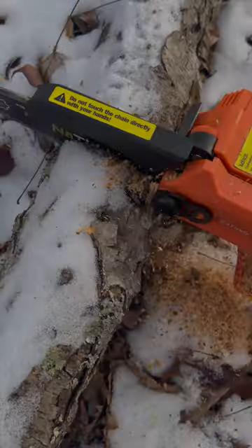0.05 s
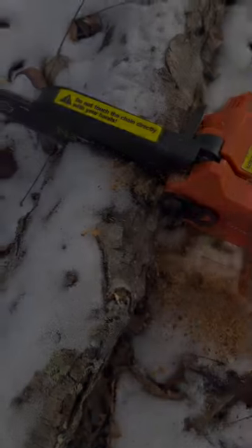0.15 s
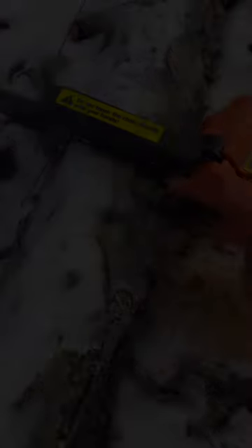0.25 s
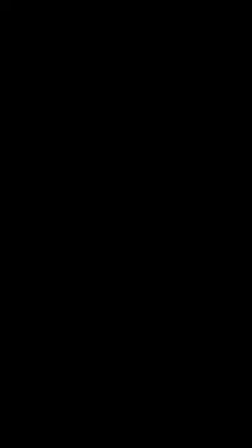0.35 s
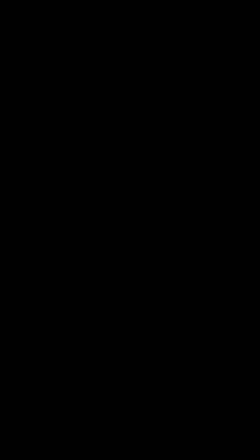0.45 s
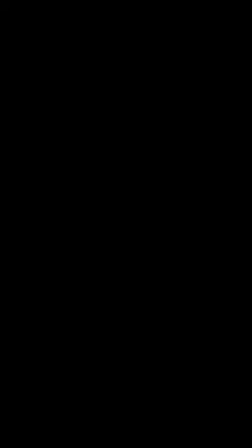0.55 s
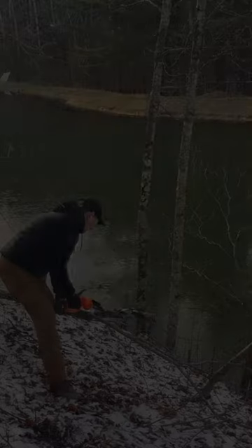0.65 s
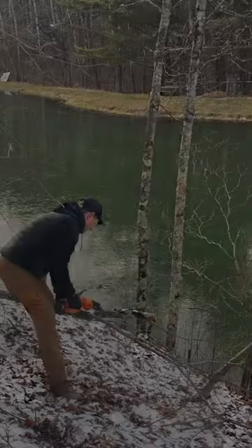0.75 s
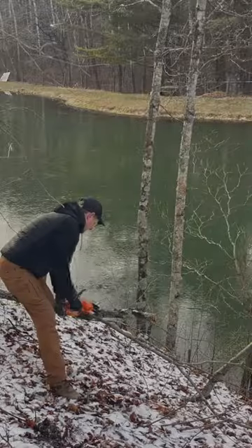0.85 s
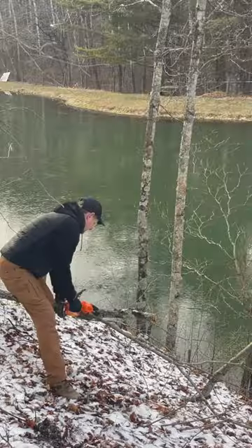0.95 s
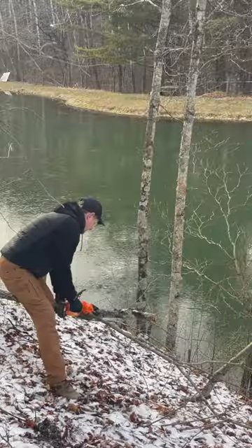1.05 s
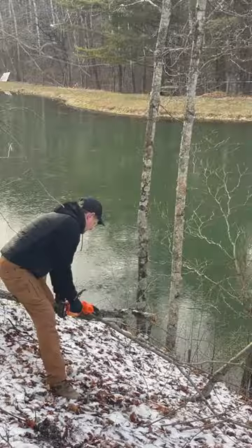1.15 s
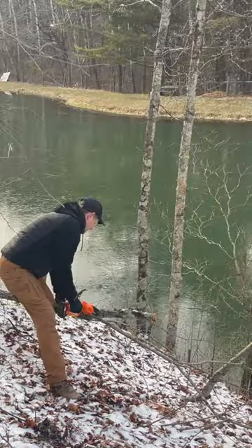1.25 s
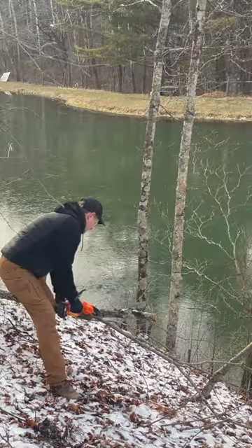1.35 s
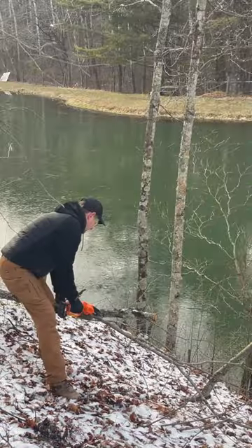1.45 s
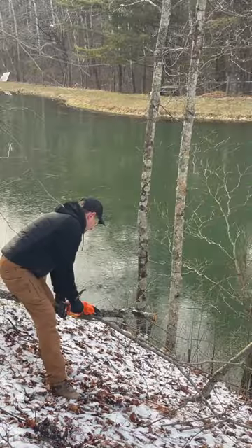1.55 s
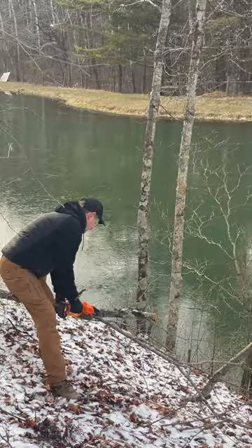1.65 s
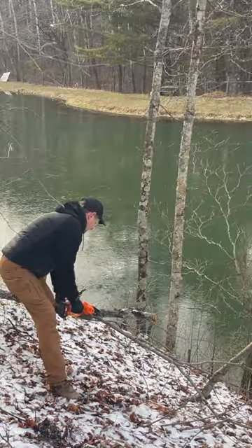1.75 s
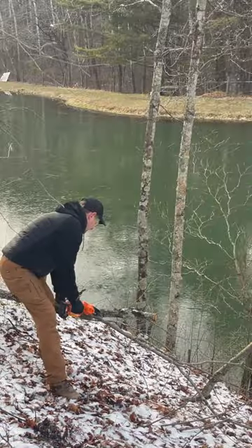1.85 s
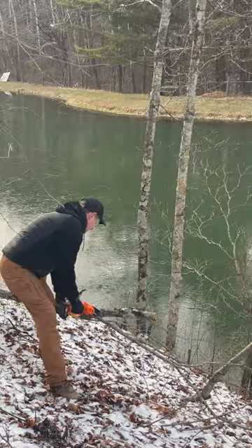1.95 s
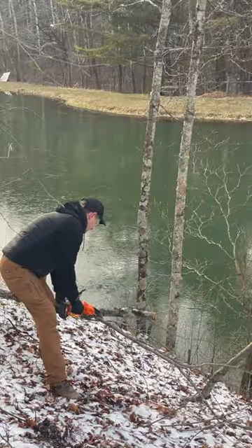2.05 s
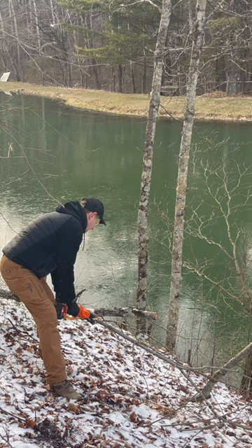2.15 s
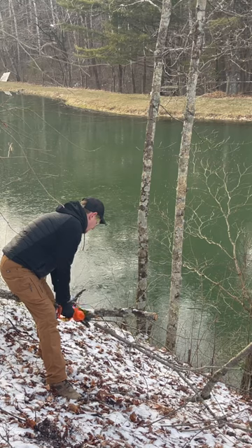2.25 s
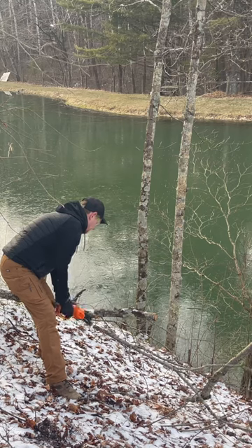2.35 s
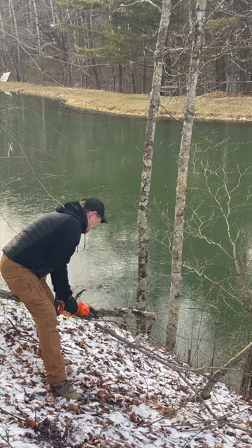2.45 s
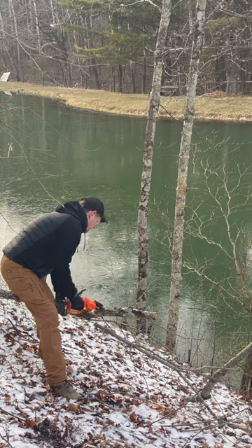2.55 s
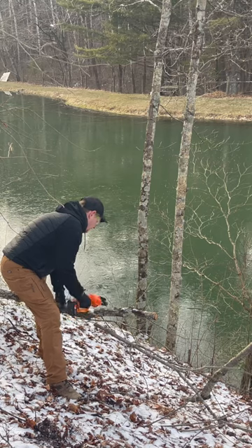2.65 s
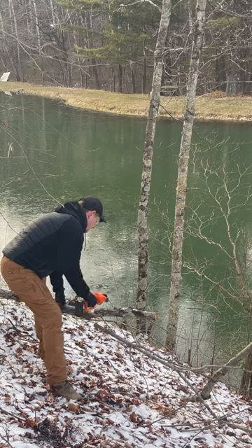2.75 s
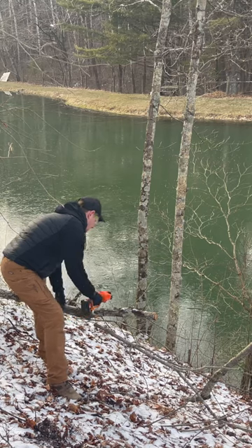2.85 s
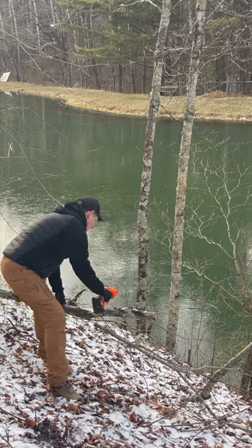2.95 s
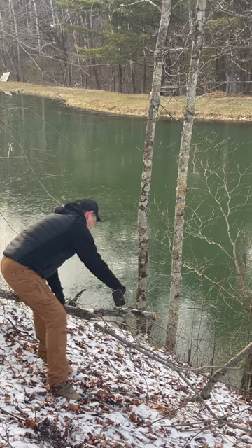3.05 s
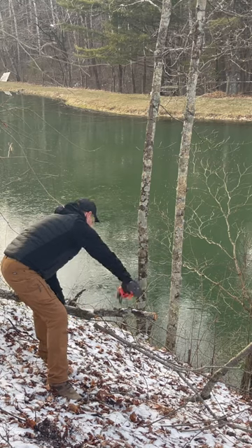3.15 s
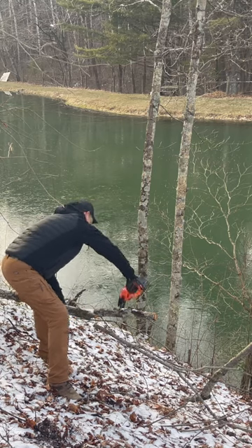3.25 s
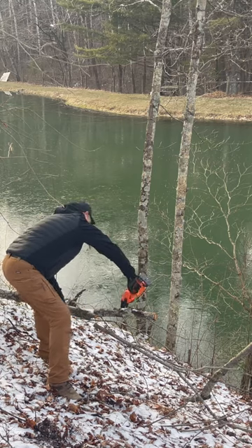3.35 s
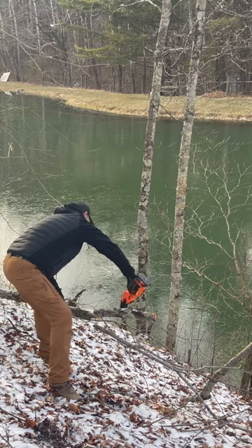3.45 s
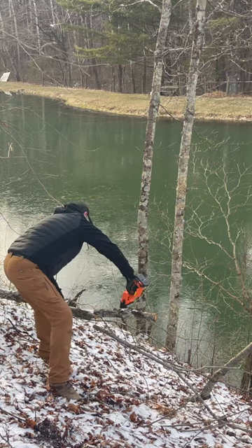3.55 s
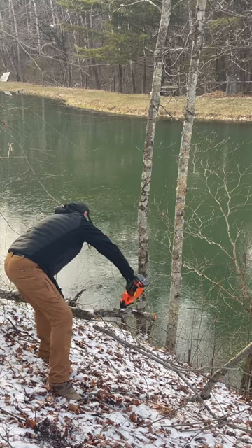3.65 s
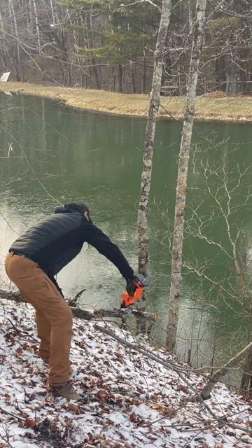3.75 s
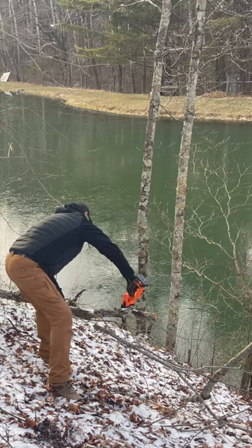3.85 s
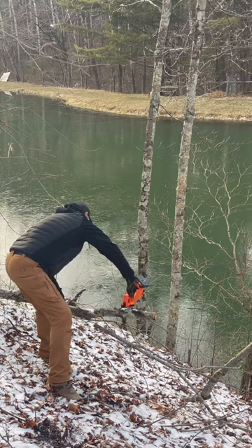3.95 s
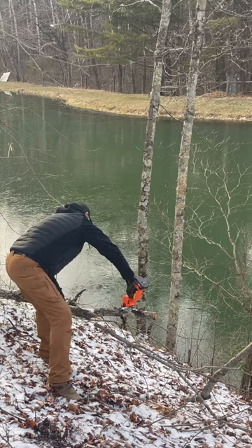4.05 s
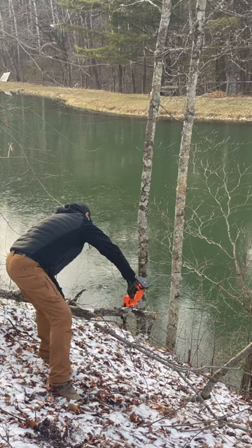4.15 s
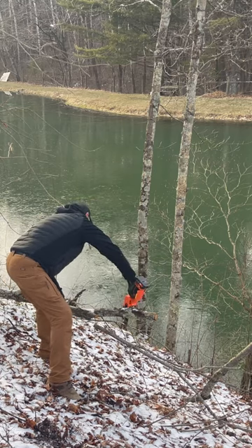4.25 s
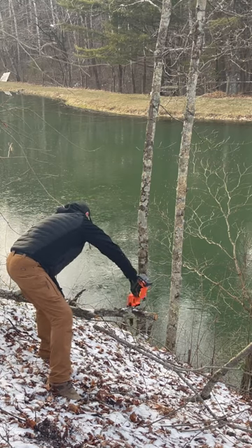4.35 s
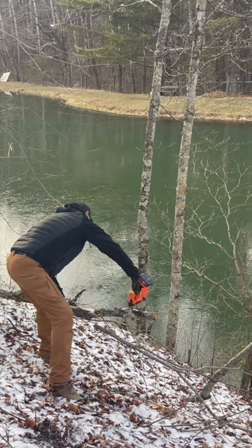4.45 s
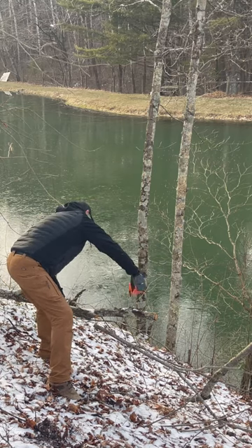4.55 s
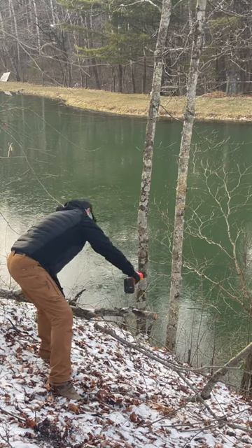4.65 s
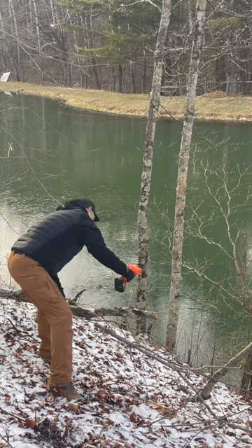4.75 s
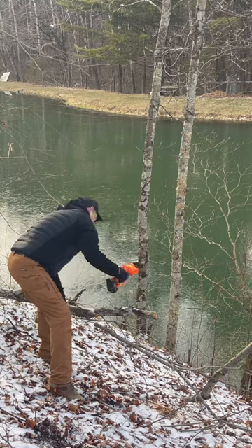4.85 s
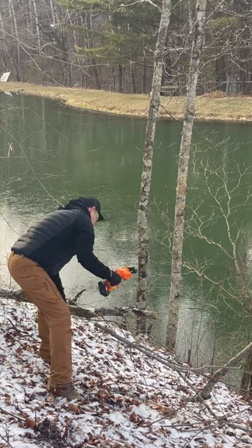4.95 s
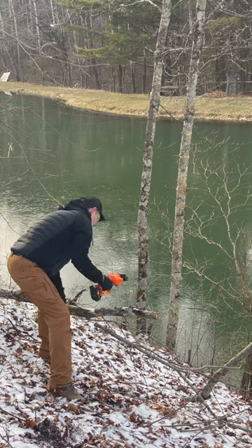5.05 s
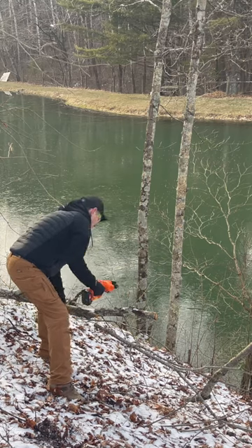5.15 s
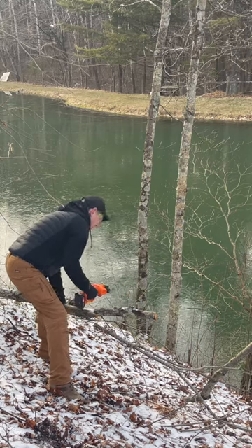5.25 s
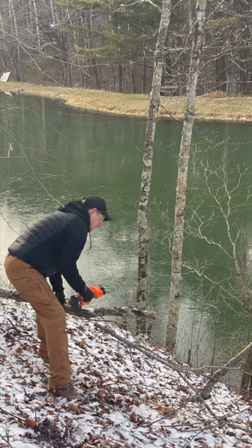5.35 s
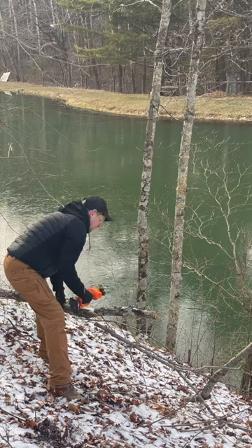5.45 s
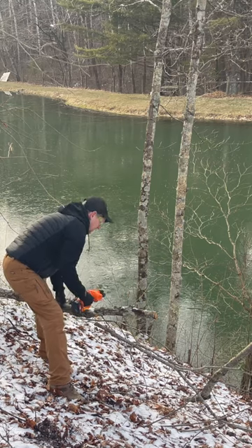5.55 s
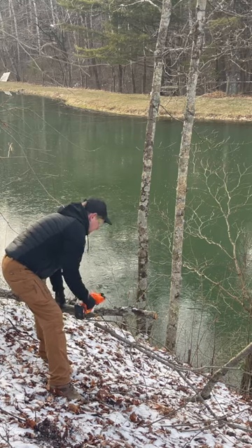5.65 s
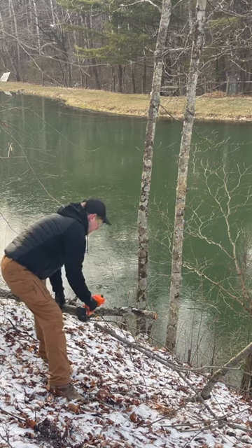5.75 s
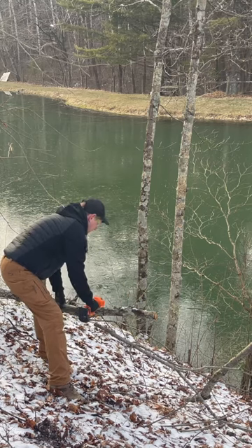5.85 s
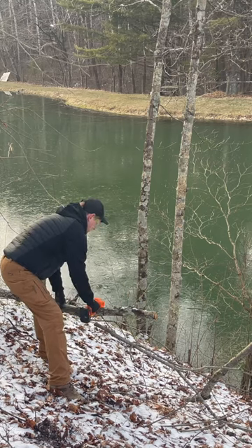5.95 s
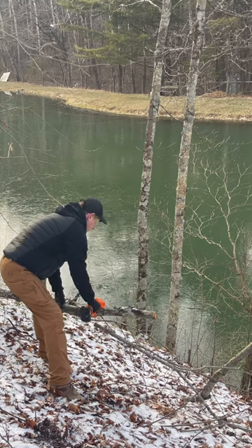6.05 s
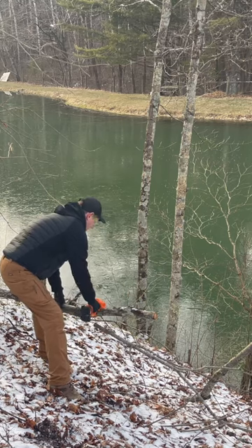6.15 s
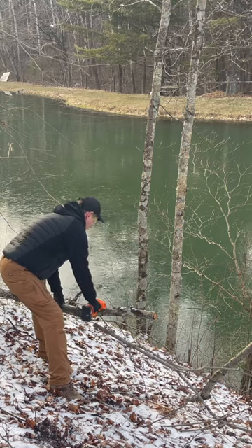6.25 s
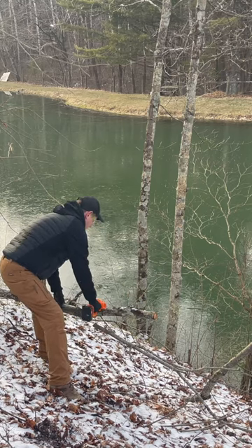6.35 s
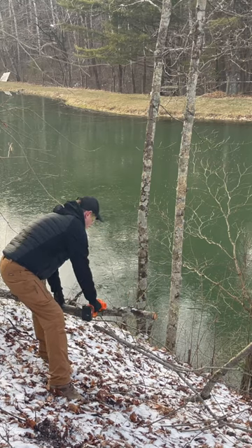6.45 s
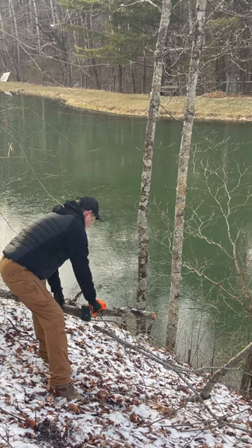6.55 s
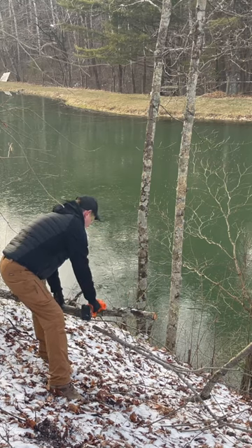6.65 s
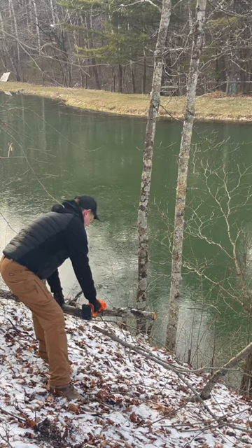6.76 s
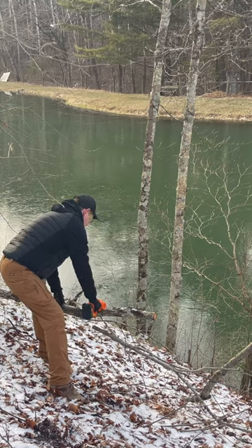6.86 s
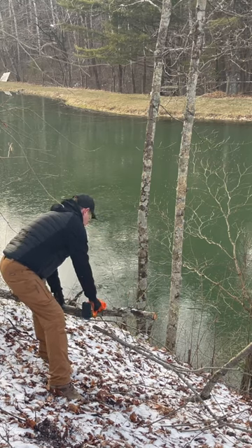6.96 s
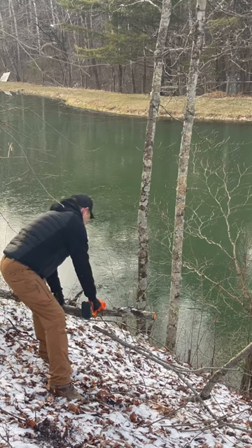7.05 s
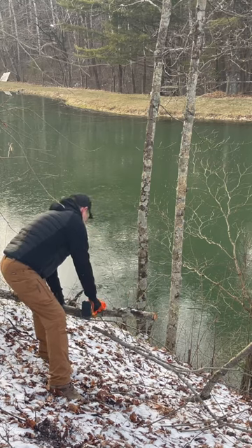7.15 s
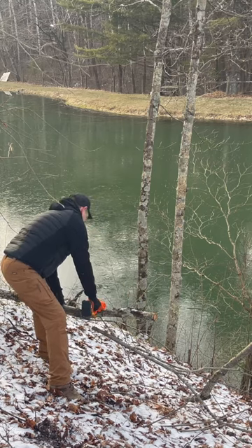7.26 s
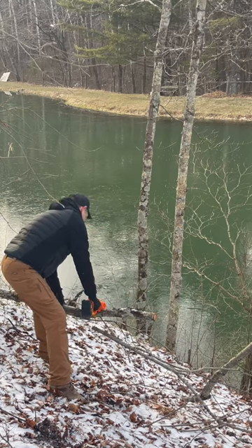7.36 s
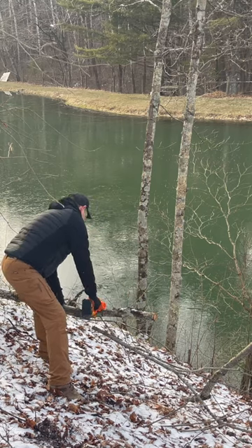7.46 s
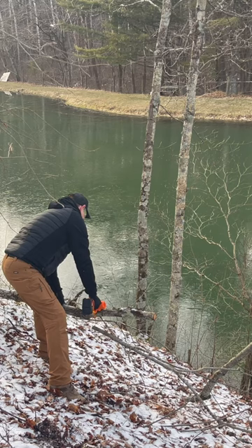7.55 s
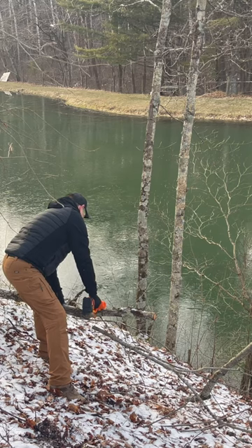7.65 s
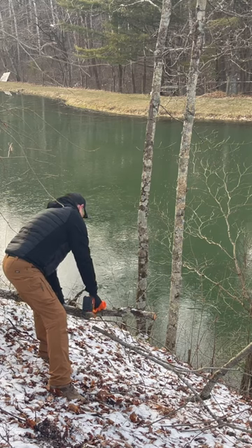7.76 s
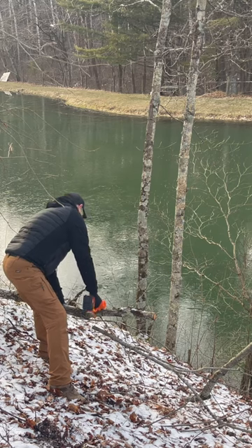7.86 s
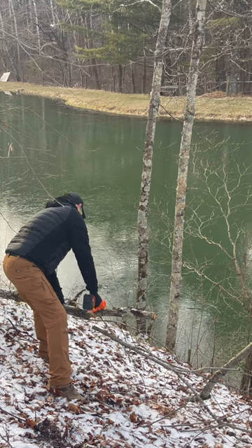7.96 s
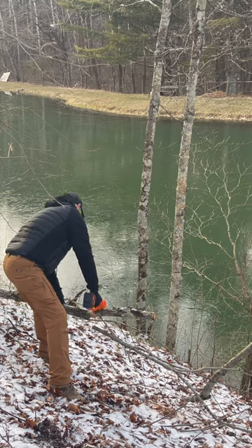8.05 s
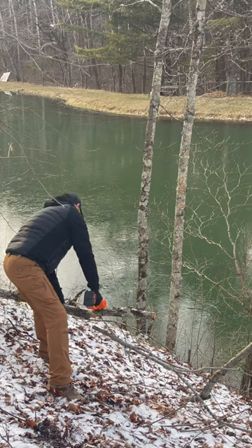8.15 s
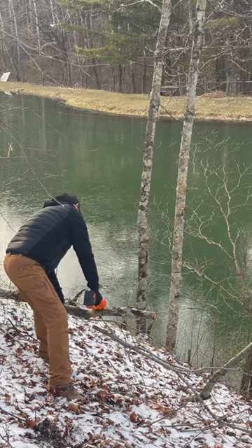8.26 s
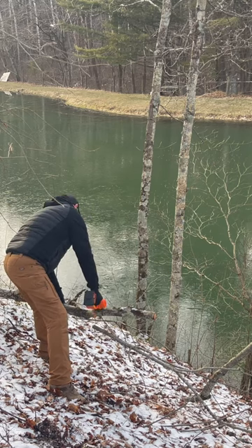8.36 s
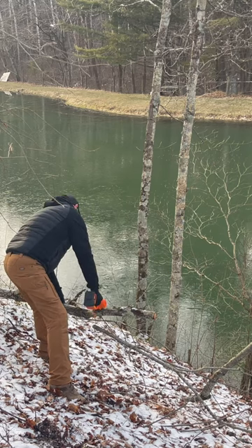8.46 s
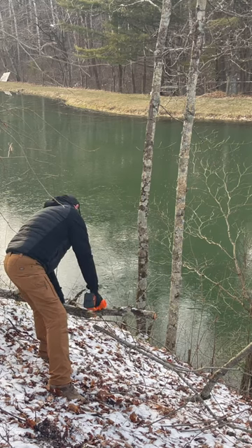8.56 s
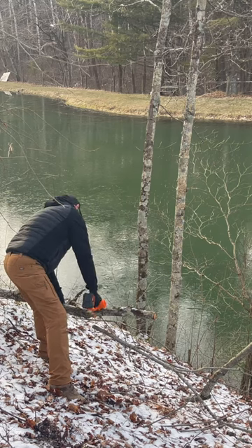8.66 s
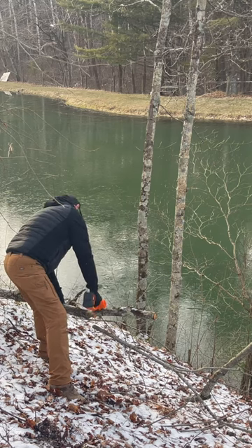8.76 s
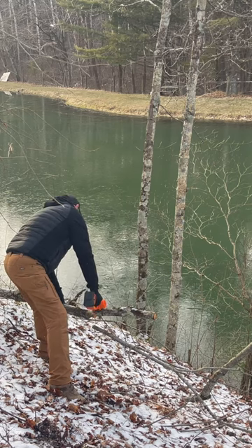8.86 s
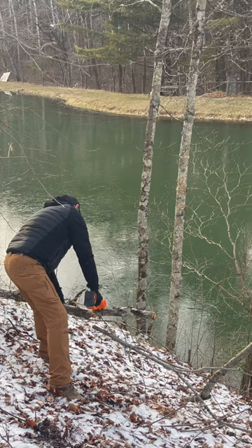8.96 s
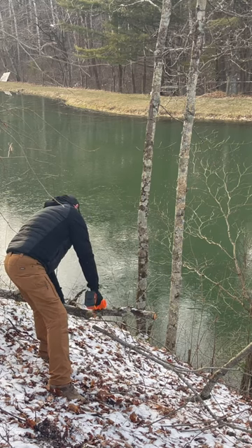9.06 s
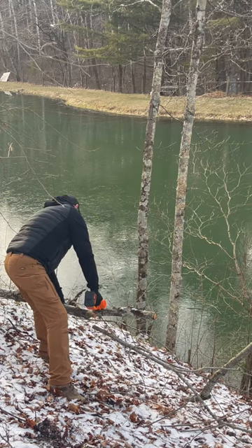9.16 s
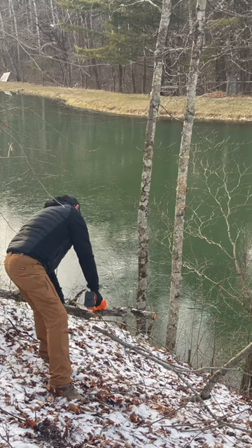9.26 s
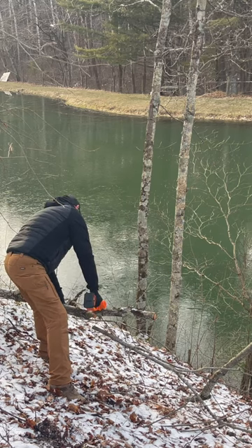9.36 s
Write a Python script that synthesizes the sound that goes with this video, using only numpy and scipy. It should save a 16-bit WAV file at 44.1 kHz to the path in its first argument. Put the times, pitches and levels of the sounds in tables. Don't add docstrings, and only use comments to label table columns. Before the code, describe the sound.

From 0 s a small battery chainsaw is already running, close, wide and gritty with a squeal near 2.4 kHz; around 0.4-0.65 s it melts into a view a few metres off, where a steady whine near 830 Hz sits under harsh chain clatter. At 1.4-2.1 s it bites, pitch sagging, with high squeals and knocks. It brakes abruptly at 2.3 s. The pause has faint clicks, a twig snap and soft thud on snow at 2.8 s. It spins up at 3.2 s, mostly free, with lower squeals and hard knocks at 3.9-4.35 s, stopping about 4.5 s. Leaves rustle; a sharp click comes at 4.8 s. From 5.7 s it restarts, then cuts heavily from 6.2 s to the end at 9.4 s, fluttering, squealing and knocking rapidly. Low distant traffic drones throughout; the wood rings faintly, with a dull late echo.

```python
import sys
import numpy as np
from scipy import signal
from scipy.fft import rfft, irfft, next_fast_len
from scipy.io import wavfile
from scipy.ndimage import uniform_filter1d, map_coordinates

SR = 44100
rng = np.random.default_rng(int(sys.argv[2]) if len(sys.argv) > 2 else 0)


def ratio(d):
    e = np.asarray(d, float) / 20
    return 10 ** e


def unload_wav(signal):
    wavfile.write(
        sys.argv[1],
        SR,
        np.round(np.clip(np.atleast_2d(signal).T, -1, 1) * 32767).astype(np.int16),
    )


N = 415422
T = np.arange(N) / SR

# (pulled [s], let go [s], whine [dB])
TRIGGER_PULLS = [
    (-1, 2.29, -39),
    (3.2, 4.51, -35.5),
    (5.715, 10, -36),
]


def unit(x):
    return x / np.sqrt(np.mean(x ** 2) + 1e-20)


def along(points, hz):
    f, v = np.transpose(points)
    return np.interp(np.log(hz + 1), np.log(f + 1), v)


def curve(rows):
    s, *cols = np.transpose(rows)
    return [np.interp(T, s, c) for c in cols]


def wobble(rate):
    return map_coordinates(rng.standard_normal(int(N * rate / SR) + 4), [T * rate])


def filtered(x, response):
    m = next_fast_len(N + SR // 4)
    return irfft(rfft(x, m) * response(np.fft.rfftfreq(m, 1 / SR)), m)[..., :N]


def noise(colour):
    return unit(filtered(rng.standard_normal(N), lambda hz: ratio(along(colour, hz))))


def ringing(modes):
    def response(f):
        total = 0
        for k, (c, w, db) in enumerate(modes):
            total = total + (-1) ** k * ratio(db) * 1j * f * w / (c * c - f * f + 1j * f * w)
        return total
    return response


def bursts(times, db, t60):
    t = np.arange(SR // 8) / SR
    grit = rng.standard_normal((len(times), len(t)))
    attack = 1 - np.exp(-t / 0.0015)
    return ratio(db[:, None] - 60 * t / t60[:, None]) * attack * grit, np.round(times * SR).astype(int)


def placed(rows, starts):
    at = starts[:, None] + np.arange(rows.shape[1])
    return np.bincount(at.ravel(), rows.ravel(), N + SR)[:N]


def closeness(t):
    close_until_s, crossfade_s = .4, .25
    return np.clip(1 - (t - close_until_s) / crossfade_s, 0, 1)


def trigger():
    spin_up_s, coast_s, brake_after_s = .08, .16, .05
    brake_db_per_s, start_db_per_s = 470, 700
    whine_grows_db = 50
    on, off, whine_db = np.transpose(TRIGGER_PULLS)[:, :, None]
    up = 1 - np.exp(-(np.clip(T - on, 0, None) / spin_up_s) ** 1.5)
    slowed = (np.clip(T - off, 0, None) / coast_s) ** 1.6
    spin = np.clip(up - slowed, .01, 1)
    brake_db = -brake_db_per_s * np.clip(T - off - brake_after_s, 0, None)
    start_db = start_db_per_s * np.clip(T - on - .045, None, 0)
    running = ratio(brake_db + start_db).sum(0)
    whine_gain = ratio(whine_db + brake_db + whine_grows_db * np.log10(spin)).sum(0)
    return spin.max(0), running, whine_gain


def jolts(load):
    # (time [s], bounces [per s])
    bounce_rate = [(0, 32), (6.3, 29), (7.4, 30), (8.2, 42), (9.42, 43)]
    beat = np.cumsum(curve(bounce_rate)[0] * (1 + .08 * wobble(9))) / SR
    shape = 3 * np.exp(-3 * (beat % 1)) - .95
    return load * (1 + .35 * wobble(25)) * shape, np.flatnonzero(np.diff(beat // 1))


def chain(load, jolt, rattle_db, facing):
    # (frequency [Hz], level [dB per Hz])
    free_colour = [(120, -39), (300, -32.5), (450, -19), (1200, -9), (3000, -6.5), (5400, -7), (9000, -7),
                   (10300, -7), (11800, -22)]
    # (frequency [Hz], level [dB per Hz])
    buried_colour = [(90, -27.5), (170, -6.5), (330, -20), (600, -8), (1200, -13), (3000, -11.5),
                     (5400, -13.5), (9000, -9.5), (10300, -21), (11800, -24.5)]
    # (centre [Hz], width [Hz])
    housing = [(230, 540), (760, 77), (1250, 210), (1760, 350), (2850, 130), (3450, 150), (4000, 400),
               (5300, 770), (5750, 380), (6200, 350), (7800, 1200), (8500, 1050)]
    # (level [dB], change with facing [dB], in wood [dB], close by [dB])
    housing_lifts = [(2, .5, 0, 11), (7, 4, -2, -2), (-2.5, 1, 2, 2), (6, 3.5, -1, 2), (-5, 4, 8, -6),
                     (0, 4.5, 0, -3), (4, 0, 1.5, 0), (.5, 0, 0, 0), (2, 1, 0, 3), (4, -2.6, 0, 3),
                     (4, .7, 2, 2), (3, 0, -2.5, -4)]
    blows = ratio(0.68 * wobble(900) + .8 * wobble(60) + 1.58 * jolt)
    hz, t, z = signal.stft(unit(blows * rng.standard_normal(N)), SR, nperseg=512)
    at = np.minimum(np.round(t * SR).astype(int), N - 1)
    bells = np.array([1 / (1 + (2 * (hz - c) / w) ** 2) for c, w in housing])
    lift = np.array(housing_lifts) @ [1 + 0 * t, facing[at], load[at], closeness(t)]
    bed = np.outer(along(free_colour, hz), 1 - load[at]) + np.outer(along(buried_colour, hz), load[at])
    patches = uniform_filter1d(rng.standard_normal(z.shape), size=5, axis=0)
    patches = uniform_filter1d(patches, size=10, axis=1)
    gain = ratio(bed + bells.T @ lift + 1.3 * unit(patches))
    bands = np.digitize(hz, [1100, 5000])
    growl_db, hiss_db = -7 + 2 * facing, -2 * facing
    balance_db = np.array([growl_db, 0 * T, hiss_db])[:, at]
    power = np.array([np.sum(gain[(bands == b) & (hz < 9500)] ** 2, axis=0) for b in range(3)])
    trim = uniform_filter1d((ratio(balance_db) / np.sqrt(power))[bands], size=9, axis=0)
    return ratio(rattle_db + 21.5) * signal.istft(z * gain * trim, SR, nperseg=512)[1][:N]


def bar(jolt):
    # (start [s], end [s], start pitch [Hz], end pitch [Hz], level [dB])
    squeals = [(-.05, .14, 2444, 2520, -26), (.15, .55, 2350, 2470, -33), (1.1, 1.4, 6450, 6440, -34),
               (1.41, 2.07, 6130, 5870, -32), (3.35, 3.9, 1745, 1840, -33), (3.9, 4.54, 1790, 1750, -35),
               (5.74, 5.84, 2660, 2550, -30), (5.88, 5.96, 2750, 2950, -35), (6.16, 6.3, 2900, 3000, -29),
               (6.27, 6.84, 2580, 2480, -32), (6.865, 6.91, 2710, 2550, -27), (6.9, 7.9, 2480, 2430, -33.5),
               (7.9, 8.2, 2400, 2260, -39), (8.22, 8.5, 2350, 2580, -30), (8.43, 8.68, 2960, 2940, -32),
               (8.67, 9.5, 2520, 2615, -29.5), (9.05, 9.3, 2945, 2950, -35)]
    edge_s = .03
    drive = (wobble(220) + 1j * wobble(220)) * ratio(3.2 * jolt * (T > .6) + 1.5 * wobble(55))
    drive = drive / np.sqrt(np.mean(abs(drive) ** 2) / 2)
    drift = 1 + .008 * wobble(12)
    out = np.zeros(N)
    for start, end, from_hz, to_hz, db in squeals:
        span = (T > start - .2) & (T < end + .2)
        t = T[span]
        pitch = drift[span] * np.interp(t, [start, end], [from_hz, to_hz])
        carrier = np.exp(2j * np.pi * np.cumsum(pitch) / SR)
        outside_s = np.maximum(np.maximum(start - t, t - end), 0)
        shape = np.exp(-(outside_s / edge_s) ** 2)
        out[span] += shape * ratio(db - 3) * np.real(drive[span] * carrier)
    return out


def kicks(bite, landings):
    # (time [s], peak [dB], low knock [dB])
    hard_catches = [(1.444, -13, -10), (1.611, -11.5, -10), (1.711, -11, -12), (1.893, -16, -4.5),
                    (2.057, -9, -25), (3.926, -12, -13), (3.968, -15, 0.5), (4.01, -12, -14),
                    (4.138, -11.5, -8), (4.169, -6, -7.5), (4.217, -12, -2), (4.305, -15, -5),
                    (4.339, -13, -7), (5.752, -20, -9), (6.096, -8, -15), (6.381, -14, -12.5),
                    (6.518, -7.5, -28), (6.589, -5, -13), (6.621, -12, -5), (6.655, -12.5, -14),
                    (6.734, -8, -9.5), (6.769, -8, -17.5), (7.015, -15, -13), (7.048, -11, -12),
                    (7.115, -12, -28), (7.152, -11, -5), (7.454, -14, -4.5), (7.693, -13, -12),
                    (8.201, -13, -11), (8.452, -10, -13)]
    # (centre [Hz], width [Hz], level [dB])
    branch = [(521, 300, -2), (840, 290, 1), (1780, 540, 5.5), (2500, 260, -2), (2950, 155, 5)]
    landings = landings[bite[landings] > .2]
    nip_db = -21 + 20 * np.log10(bite[landings]) + 3.5 * rng.standard_normal(len(landings))
    nips = [landings / SR, nip_db, -9 + 0 * nip_db]
    s, db, low_db = np.hstack([np.transpose(hard_catches), nips])
    life = .02 * ratio(1.5 * rng.standard_normal(len(s)))
    mid = filtered(placed(*bursts(s, db + 4.5, life)), ringing(branch[2:]))
    low = filtered(placed(*bursts(s, db + low_db + 14, 1.73 * life)), ringing(branch[:2]))
    crack = filtered(placed(*bursts(s, db - 16, .4 * life)), ringing([(5470, 9300, 0.0087)]))
    return mid + low + crack


def woods(x):
    # (frequency [Hz], decay by 60 dB [s])
    woods_decay = [(300, 1.2), (900, 1.3), (3000, .7), (9000, 0.39)]
    hz, t, z = signal.stft(rng.standard_normal((2, SR)), SR, nperseg=256)
    tail = signal.istft(z * ratio(-60 * t / along(woods_decay, hz)[:, None]), SR, nperseg=256)[1]
    near = ratio(-34) * signal.fftconvolve(x[None], tail / np.linalg.norm(tail[0]), axes=1)[:, :N]
    dull = filtered(x, ringing([(835, 110, 0)]))
    late = np.pad(dull, (round(.37 * SR), 0))[:N]
    return near + ratio(-35) * late * ratio([[1.5], [-1.5]])


def traffic():
    # (frequency [Hz], level [dB per Hz])
    rumble_colour = [(15, -64.5), (25, -35), (41, -16), (70, -2.5), (93, -7.5), (109, -13), (166, -21),
                     (212, -24), (598, -40.5), (1200, -57.5), (1560, -97), (2640, -120)]
    # (time [s], level [dB])
    road_level = [(.1, -57), (1.07, -46), (6, -46), (6.64, -43), (9.42, -45)]
    pitch = 81 + 1.5 * wobble(4)
    note = np.sin(2 * np.pi * np.cumsum(pitch) / SR) * ratio(-7 + 3 * wobble(5))
    return ratio(curve(road_level)[0] - 1.5 + 1.2 * wobble(6)) * (noise(rumble_colour) + note)


def whine(load, loaded, spin, gain):
    # (time [s], shaft turns lost [per s], half length [s])
    snags = [
        (4.04, 26, .05),
        (4.19, 55, .04),
        (4.35, 20, .045),
        (6.9, -32, .08),
        (8.31, 65, .04),
        (9.05, 15, .06),
    ]
    lost_turns = sum(lost * np.exp(-((T - s) / half) ** 2) for s, lost, half in snags)
    speed = spin * (loaded - lost_turns)
    smear = 1 + .002 * wobble(25) + .065 * load * wobble(160)
    turn = 2 * np.pi * np.cumsum(speed * smear) / SR
    flutter = gain * ratio((1.2 + 2 * load) * wobble(45) - 4 * load)
    first = ratio(-12 - 4 * load) * (speed / 418) ** 4
    return (1 - closeness(T)) ** 2 * np.sqrt(2) * flutter * (np.sin(2 * turn) + first * np.sin(turn))


def ground():
    # (time [s], peak [dB], pitch [Hz])
    clicks = [(2.4838, -41, 8120), (2.6583, -43, 7750), (2.752, -46, 5360), (2.835, -36, 1630),
              (2.9098, -45, 7910), (3.0024, -41, 3940), (3.036, -51, 7510), (3.187, -32, 2240),
              (3.21, -24, 1780), (4.671, -33, 8310), (4.78, -20, 8600), (4.9736, -38, 8750),
              (4.9876, -34, 8600), (5.0412, -39, 8770), (5.1437, -40, 3360), (5.2909, -40, 2670),
              (5.4147, -45, 7890), (5.4515, -51, 8310), (5.686, -32, 6330), (5.7114, -28, 2500)]
    # (frequency [Hz], level [dB])
    twig_colour = [(400, -17.5), (3000, -5.5), (9000, -8.5), (12000, -24)]
    # (time [s], peak [dB])
    thuds = [
        (2.835, -31.5),
    ]
    # (frequency [Hz], level [dB per Hz])
    leaf_colour = [(350, -36), (600, -12), (784, -11), (812, -8), (967, -10.5), (2540, -9), (5880, -15),
                   (8940, -7.5), (9700, -16), (12600, -26), (21300, -120)]
    # (time [s], peak [dB])
    leaf_stirs = [
        (2.4, -56),
        (3.22, -61),
        (4.6, -58),
        (4.75, -52),
    ]
    rise_db_per_s, fall_db_per_s, still_db = 50, 35, -69
    s, db, pitch = np.transpose(clicks)
    rows, starts = bursts(s, db, 0.027 + 0 * s)
    hz = np.fft.rfftfreq(rows.shape[1], 1 / SR)
    own_ring = 9 / (1 + (np.log((hz + 1) / pitch[:, None]) / 0.18) ** 2)
    colour = ratio(along(twig_colour, hz) + own_ring)
    snaps = placed(irfft(rfft(rows) * colour, rows.shape[1]), starts)
    s, db = np.transpose(thuds)
    log_modes = ringing([(140, 48, 11), (374, 420, -5.5), (840, 243, -10)])
    thud = filtered(placed(*bursts(s, db + 16, 0.04 + 0 * s)), log_modes)
    stirring = ratio(still_db)
    for s, db in leaf_stirs:
        stirring = stirring + ratio(db - np.maximum(rise_db_per_s * (s - T), fall_db_per_s * (T - s)))
    crackle = ratio(0.74 * wobble(46) + 1.3 * wobble(270))
    return snaps + thud + stirring * crackle * noise(leaf_colour)


def spread(x, extra_db):
    # (frequency [Hz], level [dB])
    side_level = [(60, -38), (300, -19), (1200, -18), (3000, -16.5), (5000, -14.5), (7500, -20),
                  (10000, 2.5), (11800, -2)]
    bounce_s = .004
    side = filtered(x, lambda hz: 1j * ratio(along(side_level, hz)) * np.exp(-2j * np.pi * hz * bounce_s))
    return np.array([x + ratio(extra_db) * side, x - ratio(extra_db) * side])


def scene():
    # (time [s], bite of the teeth [0-1], shaft turns [per s], chain [dB], facing [-1 bar side, 1 motor side])
    work = [(0, .6, 418, -27.5, 0), (.22, .4, 418, -30.5, -.5), (.6, .08, 418, -30.5, -1),
            (1.2, .05, 417, -27.5, -1), (1.41, .8, 365, -26, -1), (2.04, .9, 355, -27, -1),
            (2.14, .05, 416, -27, -.7), (3.24, .05, 418, -33, 1), (3.42, .05, 418, -27.5, 1),
            (3.9, .05, 418, -27, 1), (4.18, .45, 405, -26.5, 1), (4.45, .05, 418, -28.5, 1),
            (6.06, .05, 414, -29, .4), (6.28, .9, 345, -29.5, .4), (7.4, 1, 365, -28.5, .7),
            (8.25, .5, 360, -28.5, 1), (8.45, .8, 372, -27.5, 1), (9.42, .8, 360, -27, 1)]
    load, loaded, rattle_db, facing = curve(work)
    load = load.clip(.01, 1)
    spin, running, whine_gain = trigger()
    jolt, landings = jolts(load)
    saw = running * chain(load, jolt, rattle_db, facing)
    saw = saw + bar(jolt) + kicks(load * running, landings)
    saw = saw + whine(load, loaded, spin, whine_gain)
    return spread(saw, 9 * closeness(T)) + woods(saw) + spread(traffic(), 14) + spread(ground(), 10)


def band_dropouts(dry):
    # (time [s], frequency [Hz])
    ceiling = [(0, 8200), (.25, 8170), (.5, 9525), (9.42, 9470)]
    # (from [Hz], share [0-1])
    side_kept = [(0, .6), (340, .7), (690, .8), (1000, .25), (1400, .55), (1900, .2), (2600, .55),
                 (3400, .4), (4700, .3), (5700, .06), (6900, .85), (8300, .02), (9000, .7), (10500, .35),
                 (11250, 0)]
    # start [s], end [s]
    spark_gap = (6.03, 7.47)
    hz, t, (mid, side) = signal.stft([dry[0] + dry[1], dry[0] - dry[1]], SR, nperseg=1024, noverlap=768)
    block = np.round((t * SR + 347) / 1024).astype(int)
    band = (hz // 345).astype(int)
    luck = rng.random((band[-1] + 1, block[-1] + 1))[:, block]
    before_gap, after_gap = t < spark_gap[0], t > spark_gap[1]
    running = sum((t > on) & (t < off) for on, off, _ in TRIGGER_PULLS)
    running = running * (1 - closeness(t)) * (before_gap | after_gap)
    idle_share, run_share = .08, .6
    sparks = np.where(running + before_gap > 0, idle_share + (run_share - idle_share) * running, .01)
    lone = (luck[-2] < sparks) & (luck[band + 1 - (band == band[-1])] < .7)
    spark_band = ((hz > 11040) & (hz < 11730))[:, None]
    top = np.interp(t, *np.transpose(ceiling)) + 500 * (luck[-1] ** 3 - .25)
    mid = mid * ((hz[:, None] < top) | (lone & spark_band))
    edge, share = np.transpose(side_kept)
    rich = np.outer((hz > 2200) & (hz < 5200) | (hz > 7000) & (hz < 11000), t < .7)
    side = side * ((luck[band] < share[np.searchsorted(edge[1:], hz), None]) | rich)
    return signal.istft([mid + side, mid - side], SR, nperseg=1024, noverlap=768)[1][:, :N] / 2


def top_cut(x):
    return signal.sosfilt(signal.butter(12, 11770, fs=SR, output="sos"), x)


def record(dry):
    mix = band_dropouts(dry)
    return top_cut(mix)


dry = scene()
out = record(dry)
unload_wav(out)
```